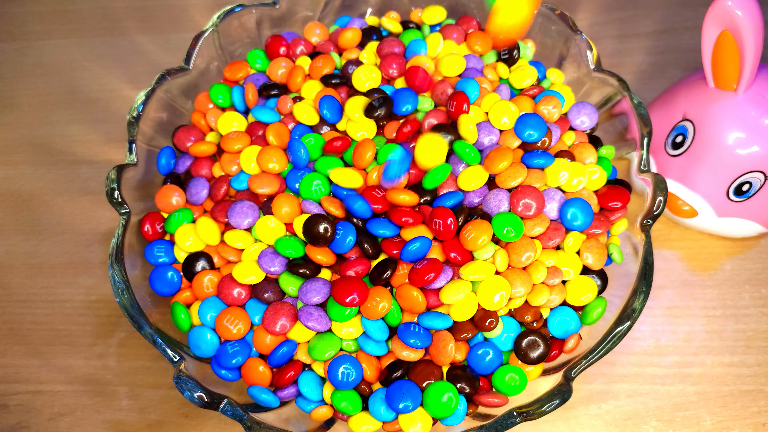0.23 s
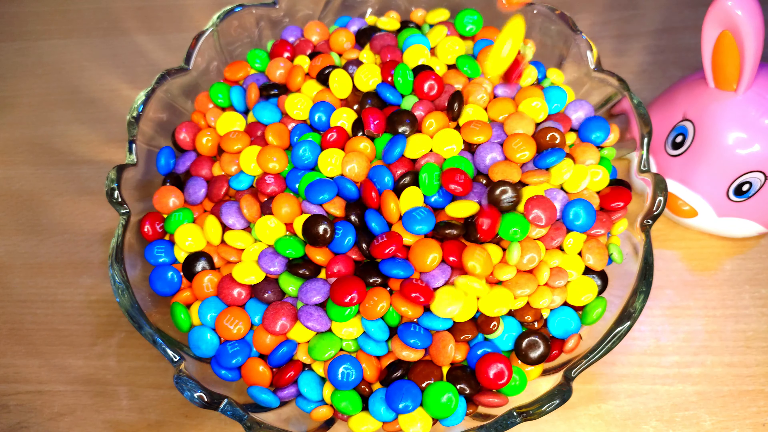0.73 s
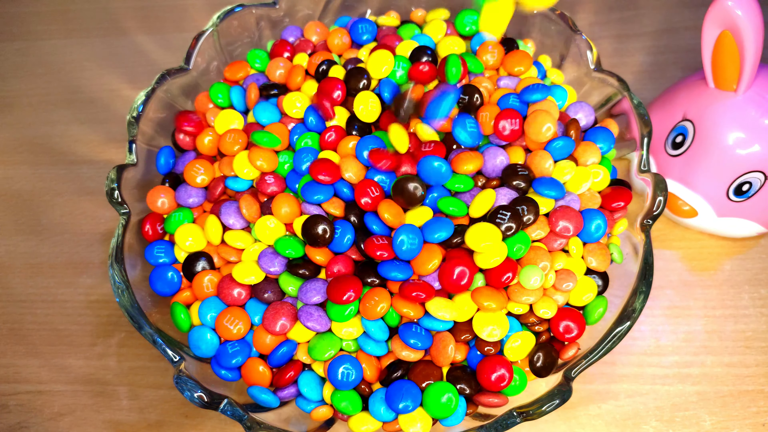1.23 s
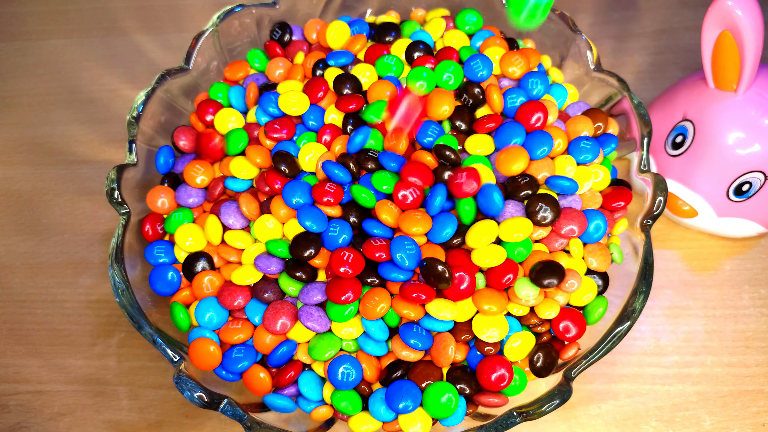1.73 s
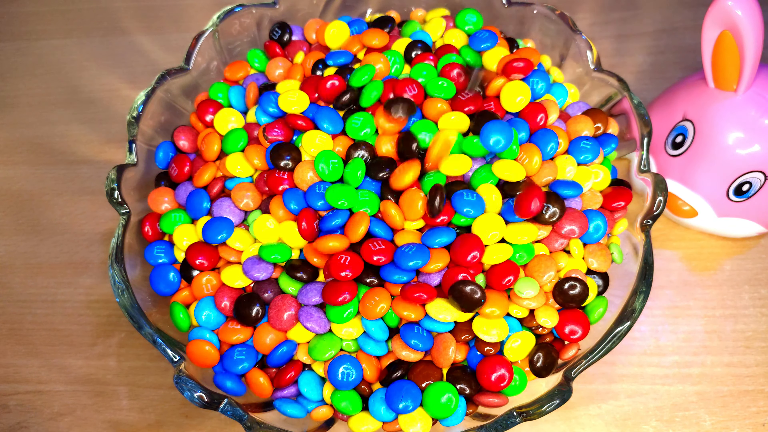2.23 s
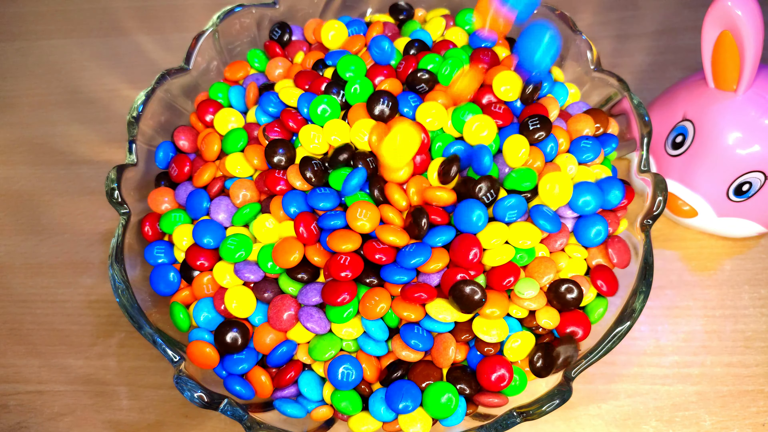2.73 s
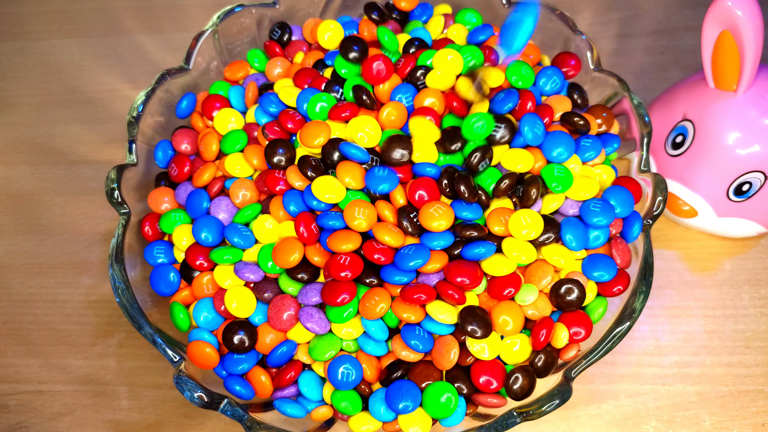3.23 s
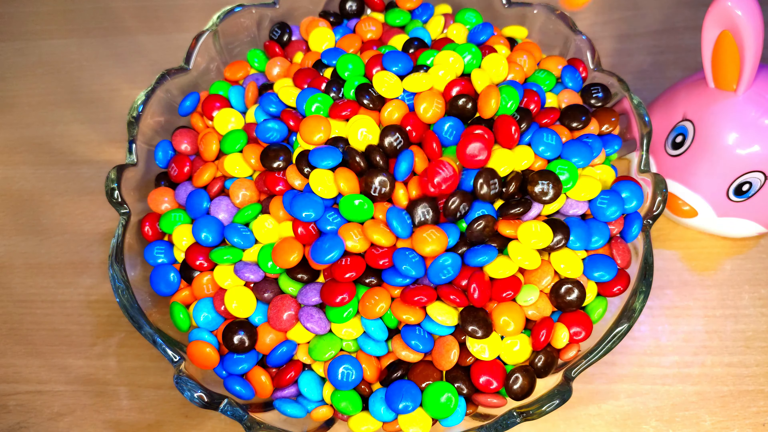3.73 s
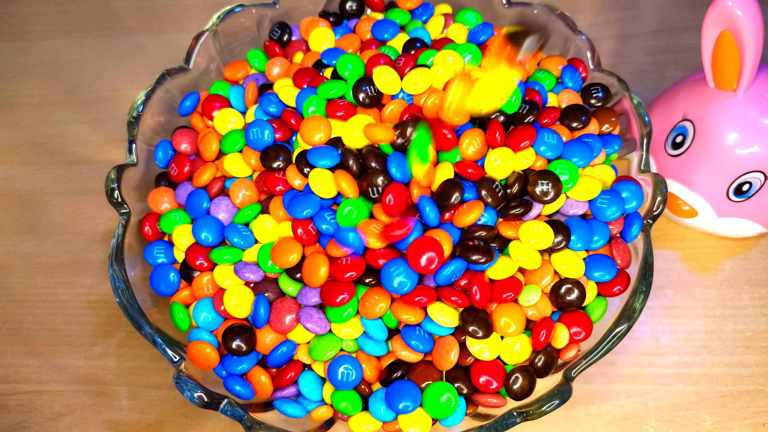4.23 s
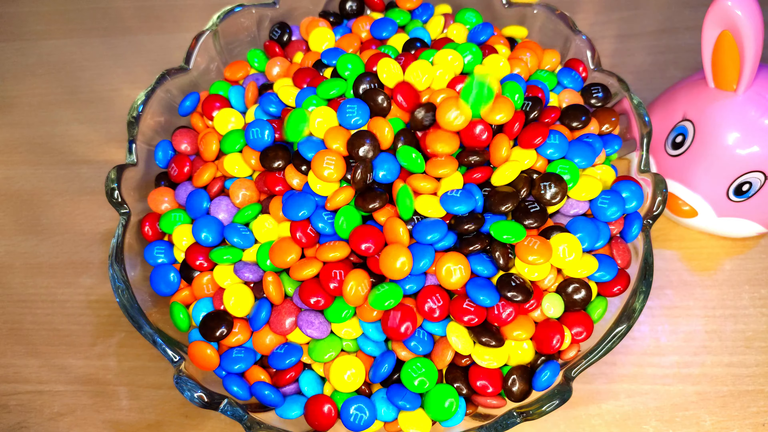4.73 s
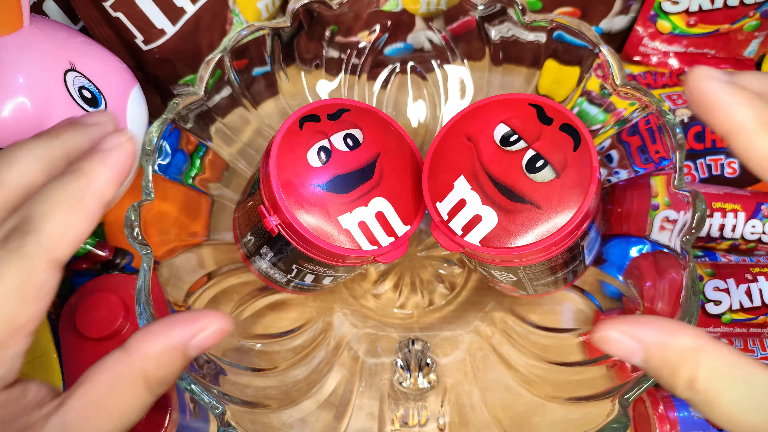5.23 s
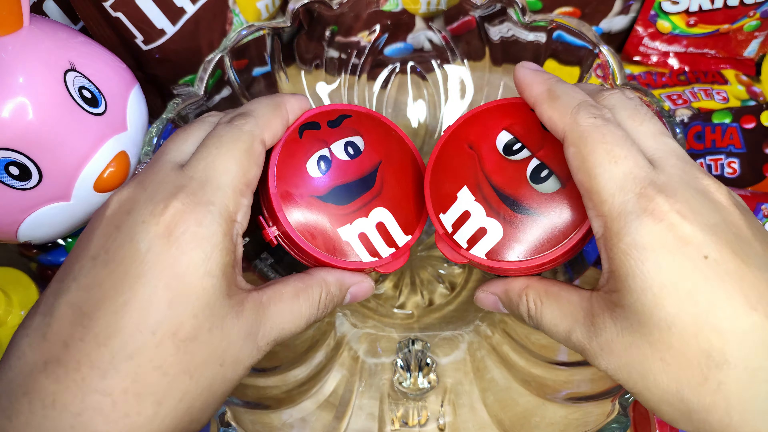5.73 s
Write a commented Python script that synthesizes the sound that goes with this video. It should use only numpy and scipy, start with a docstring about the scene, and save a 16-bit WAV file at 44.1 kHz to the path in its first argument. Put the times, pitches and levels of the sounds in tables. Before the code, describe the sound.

Close by in a small room, hard-shelled candies stream onto a heap in a glass bowl on a wooden table. Bright clicks, clacks and low knocks come in uneven clumps, with slight glassy ringing at first. The patter thins to light ticks, stops dead at about five seconds, and leaves quiet low room rumble with one soft plastic tap near the end.

```python
"""Sugar-shelled chocolate candies are poured onto a heap of them in a glass bowl on a wooden table, close by.
Each contact is a short ping in three parts: a knock of the heap, a clack of the candy and a tick of its shell.
Single landings, a random rattle and low knocks make the patter; glass, table and small room add rings and
echoes. The stream thins to a trickle; then the scene changes abruptly: coloured noise makes a quiet room with a
low rumble, and short filtered pushes make one soft tap."""
import sys
import numpy as np
from scipy import signal
from scipy.fft import rfft, irfft, next_fast_len
from scipy.io import wavfile
from scipy.ndimage import uniform_filter1d

SR = 44100
rng = np.random.default_rng(int(sys.argv[2]) if len(sys.argv) > 2 else 0)


def write(x):
    x = np.atleast_2d(x).T
    wavfile.write(sys.argv[1], SR, np.round(np.clip(x, -1, 1) * 32767).astype(np.int16))


N = 264159

BREAK_S = 5.068   # the pouring scene ends here and the quiet scene begins
ZONES = 5   # parts of the bowl, each with its own echoes


def pouring():
    """Dry landings on top and rattling within the heap, with the glass and the table ringing along."""
    # Colour of each part of a contact. Each row: frequency in Hz, relative level in dB.
    knock_colour = [(720, -9), (860, -6), (1020, -1.5), (1180, -5), (1400, -2), (1600, -6.5), (1850, -16.5)]
    clack_colour = [(1300, -13), (1550, -5.5), (2100, -2), (2450, 1), (2980, 2.5), (3350, -1.5), (3680, -1),
                    (4050, -2.5), (4900, -1), (6300, -3.5), (8400, -1.5)]
    tick_colour = [(5500, -8), (6400, -1), (7700, 0), (8900, -5), (10500, -1.5), (12400, 2.5), (14000, -1),
                   (16000, -27.5)]
    # Ringing tones of the glass bowl, damped by its load.
    # Each row: frequency in Hz, relative level in dB, time to fall 60 dB in seconds.
    bowl_modes = [(940, -6.5, 0.15), (1363, -4.5, 0.053), (2450, -10, 0.23), (3550, 9.5, 0.05),
                  (3767, 3, 0.17), (4470, -14.5, 0.13)]
    glass_db, glass_damping_db_per_s = -12, 21.5   # the glass rings less as the bowl fills

    surge = surges(per_s=75, t60=0.042, depth=2.0, crowding=.8)
    # order picks the part: 0 knock, 1 clack, 2 tick
    hits = landings(knock_colour, cycles=16.0, spread_s=.0016, early_db=-8.5, weaker_db=-9.0,
                    level_db=-1.0, order=0)
    hits += landings(clack_colour, cycles=11, spread_s=.0007, early_db=-4, weaker_db=-3,
                     level_db=-0.5, order=1)
    hits += landings(tick_colour, cycles=4, spread_s=0.0005, early_db=-7, weaker_db=-3,
                     level_db=-0.7, order=2)
    bed = rattle(knock_colour, cycles=5.4, per_s=700, uneven_db=4.5, level_db=-6.5,
                 pan_db=3.5, surge=surge, order=0)
    bed += rattle(clack_colour, cycles=11, per_s=500, uneven_db=2.0, level_db=-3.0,
                  pan_db=-3.0, surge=surge, order=1)
    bed += rattle(tick_colour, cycles=9, per_s=820, uneven_db=1.5, level_db=-2.0,
                  pan_db=-.5, surge=surge, order=2)
    hits[0] += hollows()
    direct = (hits + bed).sum(axis=0)
    into_echoes = from_db(-5.0) * hits + from_db(-1.5) * bed
    scatter = scattered(into_echoes, [(1000, 0.18), (12000, 0.062)])
    glass_drive = from_db(glass_db - glass_damping_db_per_s * np.arange(N) / SR)
    glass = through(direct * glass_drive, ringing(bowl_modes))
    return heap_ring(direct + scatter) + glass + table(surge)


def landings(colour, cycles, spread_s, early_db, weaker_db, level_db, order, count=11):
    """A falling candy strikes, with weaker contacts just before and after it."""
    # Landings of single candies that stand out, before each part's own level setting.
    # Each row: time in seconds, clack level in dB, knock and tick levels in dB relative to the clack,
    # clack pitch in Hz.
    single_landings = [(0.0868, -17, -15, -13, 4900), (0.192, -28, -5, 1, 4500), (0.224, -29, -4, 1, 5600),
                       (0.2646, -20, -15, -5, 5300), (0.3442, -26, -15, -13, 3200),
                       (0.3697, -40, 1, 12, 4400), (0.4143, -31, -7, -7, 3300),
                       (0.4228, -28, -7, -11, 3200), (0.474, -32, -5, 7, 5700), (0.5151, -28, -1, -7, 2400),
                       (0.5434, -30, -13, -1, 3400), (0.6271, -27, -13, -13, 2300),
                       (0.6697, -30, -4, -13, 4800), (0.6904, -32, 0, -13, 2500),
                       (0.7251, -23, -11, -13, 2800), (0.7411, -32, 0, -13, 2200), (0.757, -35, 2, 6, 3500),
                       (0.785, -32, -15, -13, 5000), (0.8214, -26, -15, -13, 5100),
                       (0.8468, -39, 0, 16, 1900), (0.9217, -36, -2, 12, 3000),
                       (1.0344, -21, -14, -13, 3100), (1.119, -40, 1, 13, 6200),
                       (1.1317, -31, -6, -5, 2500), (1.1571, -42, -8, 8, 4100), (1.1721, -30, -13, 2, 4400),
                       (1.1823, -36, -15, 10, 4200), (1.192, -32, -11, 4, 3700),
                       (1.2139, -21, -17, -8, 2800), (1.2474, -32, -15, 5, 2900),
                       (1.3552, -24, -11, -13, 3000), (1.3641, -23, -15, -13, 2700),
                       (1.3841, -28, -13, 0, 5500), (1.3928, -24, -15, -8, 2800),
                       (1.4579, -26, -15, -6, 5000), (1.4682, -27, -15, -4, 2900),
                       (1.5275, -28, -12, -5, 2900), (1.5971, -40, 7, 11, 2300), (1.7337, -37, -6, 8, 4700),
                       (1.7415, -30, -10, -8, 4900), (1.8518, -25, -15, -13, 2800),
                       (1.8867, -24, -15, -13, 2800), (2.1424, -30, -14, -4, 5100),
                       (2.1714, -33, -1, 4, 4900), (2.2617, -33, -7, -7, 3000),
                       (2.3142, -32, -15, -13, 2600), (2.3818, -35, 1, -13, 2800),
                       (2.417, -32, -15, -13, 2500), (2.4676, -27, -11, -10, 4500),
                       (2.5385, -27, -15, -13, 2800), (2.5904, -38, -3, 9, 4700),
                       (2.5986, -20, -15, -13, 2800), (2.644, -30, -15, -9, 3900),
                       (2.6839, -29, -15, -13, 2400), (2.8054, -33, -14, -1, 5900),
                       (2.8306, -26, -15, -2, 3700), (2.9261, -35, -11, 2, 5300),
                       (3.1059, -33, -5, -13, 2800), (3.2723, -29, -15, -3, 2700),
                       (3.3282, -34, -15, -7, 2700), (3.3497, -32, -7, -5, 2400),
                       (3.398, -35, -4, -4, 6300), (3.4142, -35, -5, -6, 2900), (3.5724, -35, -1, -1, 4500),
                       (3.5844, -35, -5, -3, 5100), (3.6467, -37, -15, -13, 4600),
                       (3.6781, -40, -15, -5, 3100), (3.7007, -46, -7, 10, 4600),
                       (3.7462, -42, -15, 6, 6100), (3.7578, -26, -15, -12, 2700),
                       (3.8146, -42, -2, 8, 6300), (3.8634, -29, -13, -5, 5600), (3.954, -53, -8, 25, 5800),
                       (4.0283, -37, -15, -11, 5200), (4.0403, -55, 15, 20, 3600),
                       (4.0468, -39, -11, -4, 5400), (4.0929, -36, -12, -9, 3500),
                       (4.1723, -65, 13, 24, 6300), (4.2007, -28, -11, -11, 2600),
                       (4.2264, -36, -7, 6, 6300), (4.2748, -55, 11, 24, 6100),
                       (4.2962, -33, -15, -13, 3100), (4.3328, -29, -8, -7, 2500),
                       (4.3556, -43, 3, 11, 1800), (4.4429, -30, -15, -16, 2800),
                       (4.5412, -33, -18, -18, 2900), (4.5923, -34, -15, -13, 2100),
                       (4.6068, -37, -13, 1, 2600), (4.6928, -48, -6, 15, 5300), (4.7164, -54, 0, 16, 6200),
                       (4.7855, -58, -3, 17, 6200), (4.8218, -51, -6, 16, 4700), (4.8338, -39, -7, 6, 5600),
                       (4.8597, -61, 15, 24, 5900), (4.8779, -64, 17, 24, 6300),
                       (4.9176, -64, 15, 24, 5900), (4.9538, -59, 7, 21, 6200), (4.9989, -58, 17, 19, 5500),
                       (5.0243, -51, -15, 2, 3600), (5.038, -57, 13, 24, 6300)]
    base_pan_db, pan_per_tick_db = -1.5, 0.22   # square hits land right of centre, glancing ones further left
    glance_db = 9.5   # a tick this far above its clack marks a glancing touch
    early_gap_s = .0009   # between the weaker contacts before the strike
    neighbour_octaves = 0.98   # largest pitch distance of a weaker contact from the strike

    s, clack_db, knock_db, tick_db, clack_hz = np.transpose(single_landings)[:, :, None]
    pan_db = base_pan_db + pan_per_tick_db * tick_db
    db = clack_db + (knock_db, 0, tick_db)[order]
    turn = np.arange(count) - count // 3   # negative: before the strike, 0: the strike, positive: after it
    jitter, detune = rng.uniform(-1, 1, (2, len(s), count))
    gap_s = np.where(turn < 0, early_gap_s, spread_s)
    when = s + gap_s * (turn + .5 * jitter) - .0003
    shares = from_db(2 * np.abs(turn) * np.where(turn < 0, early_db, weaker_db))
    # each level counts as held for 2.6 ms
    energy = from_db(2 * (db + level_db)) * 0.0026 * SR * shares / shares.sum()
    knock_hz = 1150 * 2 ** (0.29 * detune)
    clack_pitches = clack_hz * 2 ** (neighbour_octaves * detune * (turn != 0))
    # glancing touches ping high
    tick_hz = np.interp(tick_db, [-6, glance_db], [8000, 12000]) * 2 ** (0.15 * detune)
    hz = (knock_hz, clack_pitches, tick_hz)[order]
    pans = np.repeat(pan_db, count)
    return contacts(when.ravel(), energy.ravel(), pans, hz.ravel(), colour, cycles, even=1)


def rattle(colour, cycles, per_s, uneven_db, level_db, pan_db, surge, order, count=7000):
    """Countless small collisions of uneven strength; a quiet heap has fewer of them."""
    jitter, chance, strength, side, pitch = rng.random((count, 5)).T
    s = np.abs(np.arange(count) + 4 * jitter - 2) * BREAK_S / count
    db = jostling(s)[order]
    lowest, highest = colour[1][0], colour[-2][0]
    skew = 1.9 if order == 0 else 1   # buried knocks are mostly low
    hz = lowest + (highest - lowest) * pitch ** skew
    most_per_s = count / BREAK_S
    rate = np.minimum(per_s * from_db(0.34 * (db + 41.5)), most_per_s)
    size = from_db(2 * uneven_db * np.minimum(-np.log(1 - strength), 3))
    energy = from_db(2 * (db + level_db)) * SR / rate * size / size.mean()
    energy = energy * surge[(s * SR).astype(int)]
    happens = chance < rate / most_per_s
    pans = pan_db + 5 * (2 * side - 1)
    return contacts(s, energy * happens, pans, hz, colour, cycles, even=0.26)


def contacts(s, energy, pan_db, hz, colour, cycles, even, size=512):
    """Each contact is a fading sine at its own pitch, coloured by the body; gives zones x ears x time."""
    heard = energy > 0
    spot, damping = rng.random((len(s), 2))[heard].T
    s, energy, pan_db, hz = s[heard], energy[heard], pan_db[heard], hz[heard, None]
    t = np.arange(size, dtype=np.float32) / SR
    # higher pings die sooner; each one's damping varies up to twofold either way
    middle_hz = np.sqrt(colour[1][0] * colour[-2][0])
    t60 = cycles * 2 ** (2 * damping[:, None] - 1) / np.sqrt(hz * middle_hz)
    decay = np.exp(-t * np.float32(np.log(1000) / t60))
    pings = decay * np.sin(t * np.float32(2 * np.pi * hz))
    pings /= np.linalg.norm(pings, axis=1, keepdims=True)
    body_spectrum = rfft(np.float32(body(colour)[:size]), 2 * size)
    pings = irfft(rfft(pings, 2 * size) * body_spectrum)[:, :size]
    # unless evened out, pings near a resonance of the body are louder
    response = np.sum(pings ** 2, axis=1)
    pings *= np.sqrt(energy / (response ** even * np.mean(response ** (1 - even))))[:, None]
    lag_s = .00004 + .0002 * (2 * spot - 1)   # the path to the two microphones differs
    zone = (spot * ZONES).astype(int)
    left_share = 1 / (1 + from_db(-2 * pan_db))
    ears = []
    for share, delay in ((left_share, lag_s / 2), (1 - left_share, -lag_s / 2)):
        start = zone * N + np.maximum(np.round((s + delay) * SR), 0).astype(int)
        at = start[:, None] + np.arange(size)
        weighted = pings * np.sqrt(2 * share)[:, None]
        ear = np.bincount(at.ravel(), weighted.ravel(), ZONES * N)
        ears.append(ear.reshape(ZONES, N))
    return np.stack(ears, axis=1)


def jostling(t, count=2000):
    """Levels (dB) of knocks, clacks and ticks in the heap at times t: the stream plus clumps still settling."""
    # The stream of candies. Each row: time in seconds, clack level in dB, tick level in dB relative to the clack.
    flow = [(0, -30, 0.9), (.3, -33.5, -3), (.48, -45, 5.5), (.65, -41, -14.5), (.9, -50.5, -8.5),
            (1.1, -35.5, -2.5), (1.15, -47, -9), (1.45, -43, 5), (1.7, -44.5, -9.5), (2.0, -34, 0.7),
            (2.3, -65, 1), (3.05, -49.5, 10), (3.25, -46.5, -1), (3.7, -57, 0), (3.93, -86.5, 10.5),
            (4.15, -64.5, -5), (4.42, -48.5, -1), (4.75, -61.5, 13), (5.06, -77, 16.5)]
    # Clumps that tumble out together. Each row: start in seconds, length in seconds, clack level in dB,
    # tick level in dB relative to the clack.
    clumps = [(0.505, 0.05, -34.5, -3), (0.785, 0.0049, -35, -10.5), (0.844, 0.043, -37, -7),
              (0.916, 0.027, -34, -5.5), (0.982, 0.045, -43.5, 10.5), (1.158, 0.088, -41.5, 4),
              (1.26, 0.014, -35.5, 3), (1.294, 0.031, -31.5, -3.5), (1.378, 0.069, -36, 1),
              (1.472, 0.0069, -33, 1), (1.515, 0.035, -35.5, 4), (1.589, 0.032, -39, 3),
              (1.642, 0.045, -59, 20.5), (1.75, 0.0059, -32.5, -5.5), (1.79, 0.0042, -35.5, -0.8),
              (2.038, 0.06, -52, 13.5), (2.119, 0.05, -37.5, -4.5), (2.173, 0.041, -50, 13.5),
              (2.235, 0.033, -41, -3), (2.311, 0.021, -49.5, 8), (2.355, 0.023, -44, 3),
              (2.408, 0.09, -38.5, -7), (2.55, 0.09, -43, -1), (2.691, 0.045, -36, -1.5),
              (2.833, 0.042, -40, -1.5), (2.899, 0.037, -43.5, 5), (2.938, 0.0227, -30.5, -4.5),
              (2.995, 0.042, -41, 1.5), (3.06, 0.06, -43, -0.5), (3.123, 0.006, -33.5, -18),
              (3.126, 0.047, -43, 3.5), (3.337, 0.016, -36, -8), (3.438, 0.013, -43, -5),
              (3.491, 0.035, -39.5, -0.0), (3.584, 0.055, -63, 22), (3.75, 0.034, -45.5, 1),
              (3.856, 0.0036, -50.5, -2), (4.187, 0.036, -47.5, -8), (4.265, 0.022, -39.5, -2.5),
              (4.32, 0.0067, -32.5, -9), (4.358, 0.049, -42.5, 6), (4.444, 0.037, -48.3, 10),
              (4.586, 0.043, -47, 5.5)]
    knock_db, slide_knock_db = -6, -13   # knocks relative to clacks, and to the ticks of sliding candies

    grid = np.linspace(0, N / SR, count)
    flow_db, sliding_db = in_time(flow, grid)
    clack, tick = from_db(2 * flow_db), from_db(2 * (flow_db + sliding_db))
    for s, hold_s, db, tick_db in clumps:
        power = from_db(2 * db) * swell(grid - s, hold_s)
        clack = clack + power
        tick = tick + power * from_db(2 * tick_db)
    knock = clack * from_db(2 * knock_db) + tick * from_db(2 * slide_knock_db)
    return [np.interp(t, grid, 10 * np.log10(power)) for power in (knock, clack, tick)]


def swell(age_s, hold_s):
    """Power of a clump: it crashes down, rattles for its length and settles."""
    attack_s, t60_s = 0.01, 0.13
    settling_s = np.maximum(age_s - attack_s - hold_s, 0)
    return np.clip(age_s / attack_s, 0, 1) * from_db(-120 * settling_s / t60_s)


def surges(per_s, t60, depth, crowding):
    """Small slips set off flurries that die away, more often in a heavy stream; power about a local mean of one."""
    chance, strength = rng.random((2, N))
    clack_db = jostling(np.arange(N) / SR)[1]
    rate = per_s * from_db(crowding * (clack_db + 41.5))
    keep = from_db(-120 / (t60 * SR))   # share of power left after each sample
    slips = (chance < rate / SR) * (.5 + strength) * SR / np.maximum(rate, per_s)
    flurries = signal.lfilter([1 - keep], [1, -keep], slips)
    power = 1 + depth * flurries
    return power / uniform_filter1d(power, size=1300)


def hollows():
    """A square hit makes the heap knock at a low pitch, with a few rough overtones."""
    # Hollow knocks deep in the heap. Each row: start in seconds, pitch in Hz, level in dB before the soft onset.
    hollow_knocks = [(.128, 630, -45), (.617, 720, -47), (1.0, 690, -43), (1.133, 650, -43.5),
                     (1.275, 700, -39), (1.65, 665, -44.5), (1.802, 640, -41.5)]
    t60_s = .03
    out = np.zeros(N)
    for s, hz, db in hollow_knocks:
        overtones = [(hz * ratio, -5, 1.1 * t60_s) for ratio in rng.uniform(1.4, 1.5, size=3)]
        knock = ringing([(hz, 0, t60_s)] + overtones)
        knock *= from_db(db) * np.sqrt(0.054 * SR)   # energy of the level held for 54 ms
        knock *= 1 - np.exp(-np.arange(len(knock)) / (0.0021 * SR))   # the loose heap takes a moment to swing
        start = round(s * SR)
        out[start:start + len(knock)] += knock
    return out


def scattered(zones, t60_by_hz, size=8192):
    """Echoes off glass and neighbouring candies; each zone has its own, and they change as the heap shifts."""
    out = np.zeros((2, N + 2 * size))
    for zone in zones:
        for start in range(0, round(BREAK_S * SR), size):
            echoes = reflections(t60_by_hz, delay_s=.0004, size=size // 2, count=4)
            piece = signal.fftconvolve(zone[:, start:start + size], echoes, axes=1)
            out[:, start:start + piece.shape[1]] += piece
    return out[:, :N]


def heap_ring(x):
    """The heap's own resonance changes the clacks near its pitch: lifted or cut by a level curve."""
    # Strength of the resonance. Each row: time in seconds, change in dB at its pitch.
    ring_lift = [(.2, -8), (.7, 0.5), (4.55, 0.5), (4.75, -6.5)]
    heap_hz, width_hz = 2940, 350
    ring = signal.lfilter(*signal.iirpeak(heap_hz, heap_hz / width_hz, fs=SR), x + 1e-18)
    return x + ring * (from_db(in_time(ring_lift, np.arange(N) / SR)[0]) - 1)


def table(surge):
    """The pelting of the bowl, as noise, and a few bumps set the table top booming."""
    # How hard the pelting drives the table. Each row: time in seconds, level in dB relative to the knocks.
    thud_curve = [(0, -16.5), (.6, -11), (1.1, -15), (3.0, -21.5), (3.9, -15.5), (4.8, -24.5)]
    # Tones of the table top. Each row: frequency in Hz, relative level in dB, time to fall 60 dB in seconds.
    table_modes = [(133, -16, 0.3), (166.4, -13, 0.47), (242.8, -11.5, 0.23), (325, -4, 0.083),
                   (384.6, -1, 0.056), (451, 0.5, 0.05), (538, 0.5, 0.048), (659.5, 10.5, 0.045),
                   (754, 9, 0.022)]
    # Bumps on the table. Each row: time in seconds, level in dB before the left-right balance.
    bump_rows = [(.09, -71), (.265, -46.5), (.55, -57)]
    t = np.arange(N) / SR
    mid, side = rng.standard_normal((2, N))
    noise = mid + 0.26 * side * [[1], [-1]]
    pelting = noise * np.sqrt(surge) * from_db(jostling(t)[0] + in_time(thud_curve, t)[0])
    dull = body([(35, -3), (130, -10.5), (350, -9.0), (600, -13.5)])
    bumps = through(blows(bump_rows, hold_s=0.028), dull) * from_db([[2], [-3]])   # louder on the left
    return through(pelting, ringing(table_modes)) + bumps


def taps():
    """Fingers softly meet a light plastic tub: short pushes through its colour, with close echoes."""
    # The touches within the tap. Each row: time in seconds, level in dB before the mix with echoes.
    touches = [(5.832, -67), (5.851, -77), (5.879, -75.5)]
    # Colour of the plastic. Each row: frequency in Hz, relative level in dB.
    plastic_colour = [(500, -25.5), (950, 2), (1500, -9), (2300, -4.5), (4000, -13), (6500, -21),
                      (9000, -39)]
    tap = through(blows(touches, hold_s=0.0082), body(plastic_colour))
    echoes = reflections([(1000, .08), (8000, 0.07)], delay_s=0.00049)
    return 0.84 * tap + 1.3 * through(tap, echoes)


def blows(rows, hold_s):
    """One push per row, with the energy of its level held for that long."""
    s, db = np.transpose(rows)
    pushes = np.zeros((1, N))
    pushes[0, np.round(s * SR).astype(int)] = from_db(db) * np.sqrt(hold_s * SR)
    return pushes


def ringing(modes, size=16384):
    """Response of a struck object: decaying sines of alternating sign, unit energy."""
    t = np.arange(size) / SR
    response = 0
    for k, (hz, db, t60) in enumerate(modes):
        response = response + from_db(db - 60 * t / t60) * np.sin(2 * np.pi * hz * t) * (-1) ** k
    return response / np.linalg.norm(response)


def body(colour, size=2048):
    """Prompt (minimum-phase) response with this colour and unit energy, 35 dB lower an octave outside it."""
    hz = np.maximum(np.fft.rfftfreq(size, 1 / SR), 1)
    octaves_outside = np.abs(np.log2(hz / np.clip(hz, colour[0][0], colour[-1][0])))
    gain = from_db(at_hz(colour, hz) - 35.4 * np.minimum(octaves_outside, 1))
    # folding the cepstrum puts the energy as early as this colour allows
    cepstrum = irfft(np.log(gain))
    cepstrum[1:size // 2] *= 2
    cepstrum[size // 2 + 1:] = 0
    response = irfft(np.exp(rfft(cepstrum)))
    return response / np.linalg.norm(response)


def reflections(t60_by_hz, delay_s, size=16384, count=12):
    """Dense echoes as noise that dies away band by band, with equal total energy per Hz."""
    white, hz = stereo_noise(size)
    t = np.arange(size) / SR - delay_s
    edges = np.r_[0, np.geomspace(200, SR / 2, count)]
    out = 0
    for low, high in zip(edges, edges[1:]):
        t60 = at_hz(t60_by_hz, (low + high) / 2)
        fade = from_db(-60 * np.maximum(t, 0) / t60) * (t > 0)
        band = irfft(white * (hz >= low) * (hz < high))
        out = out + band * fade / np.linalg.norm(fade)
    return out


def background(colour, level_db):
    """Steady coloured noise on a level curve."""
    size = next_fast_len(N)
    white, hz = stereo_noise(size)
    x = irfft(white * from_db(at_hz(colour, hz)), size)[:, :N]
    return x / x.std() * from_db(in_time(level_db, np.arange(N) / SR)[0])


def stereo_noise(size):
    """Spectrum of white noise, more alike in both ears in the bass than in the treble, and its frequencies."""
    # Likeness of left and right. Each row: frequency in Hz, likeness (0 unrelated, 1 the same).
    likeness = [(30, 0.52), (250, 0.49), (600, 0.24), (1200, 0.24), (2500, 0.17), (14000, 0.038)]
    hz = np.fft.rfftfreq(size, 1 / SR)
    mid, side = rfft(rng.standard_normal((2, size)))
    alike = np.clip(at_hz(likeness, hz), -1, 1)
    shared = np.sqrt(1 + alike) * mid
    opposed = np.sqrt(1 - alike) * side * [[1], [-1]]
    return (shared + opposed) / np.sqrt(2), hz


def from_db(db):
    """Decibels to gain."""
    return 10 ** (np.asarray(db) / 20)


def in_time(rows, t):
    """The columns of a curve at the times t."""
    s, *columns = np.transpose(rows)
    return [np.interp(t, s, c) for c in columns]


def at_hz(points, hz):
    """A spectrum read on a log-frequency axis."""
    f, value = np.transpose(points)
    return np.interp(np.log(np.maximum(hz, 1)), np.log(f), value)


def through(x, response):
    """Sound passed through an impulse response."""
    return signal.fftconvolve(x, np.atleast_2d(response), axes=1)[:, :N]


def scene():
    """The pouring in its room, then the scene changes to a quiet room."""
    # Echoes of the room. Each row: frequency in Hz, time to fall 60 dB in seconds.
    room_t60 = [(150, 0.78), (800, 0.62), (2000, 0.093), (7000, 0.12), (14000, 0.073)]
    # Noise colours while pouring, in the quiet and of the rumble.
    # Each row: frequency in Hz, relative level in dB per Hz.
    air_colour = [(25, -3), (60, -10), (150, -13), (400, -12.5), (1500, -23), (14000, -38.5)]
    quiet_colour = [(60, 0.5), (200, 0.5), (330, -7.5), (1000, -16.5), (5000, -27), (8000, -33),
                    (14000, -35)]
    rumble_colour = [(15, 8), (28, 0), (42, 4), (58, 2.5), (80, -9), (135, -6.5), (190, -24), (300, -62)]
    # Their loudness over time. Each row: time in seconds, level in dB.
    air_level = [(0, -49.5), (.6, -64.5), (2, -71), (3, -79.5), (5.06, -81.5)]
    quiet_level = [(5.07, -66), (5.3, -70.5), (5.99, -70.5)]
    rumble_level = [(5.101, -54), (5.24, -58), (5.5, -62), (5.8, -61), (5.95, -72.5)]
    candy = pouring()
    room = from_db(-12.0) * through(candy, reflections(room_t60, delay_s=0.0038))
    before = candy + room + background(air_colour, air_level)
    after = background(quiet_colour, quiet_level) + background(rumble_colour, rumble_level) + taps()
    fade = np.clip((np.arange(N) / SR - BREAK_S) / 0.0047, 0, 1)   # a 4.7 ms crossfade
    return before * (1 - fade) + after * fade


def record(dry):
    """A steep low-pass filter cuts the top."""
    cutoff_hz = 14500
    steep = signal.ellip(10, .3, 80, cutoff_hz, fs=SR, output="sos")
    return signal.sosfilt(steep, dry)


dry = scene()
out = record(dry)
write(out)
```